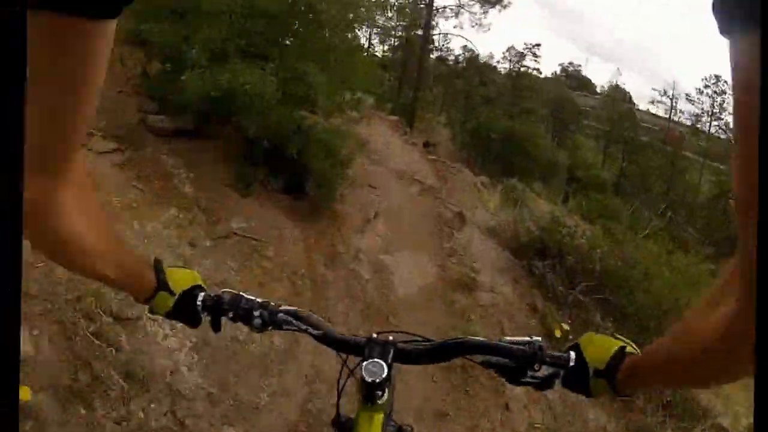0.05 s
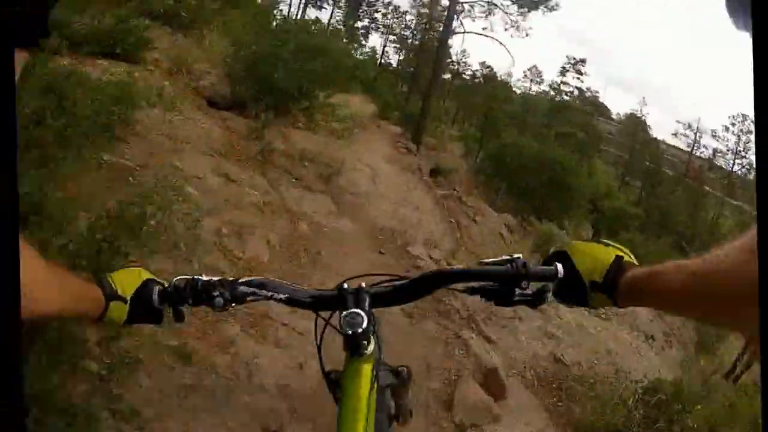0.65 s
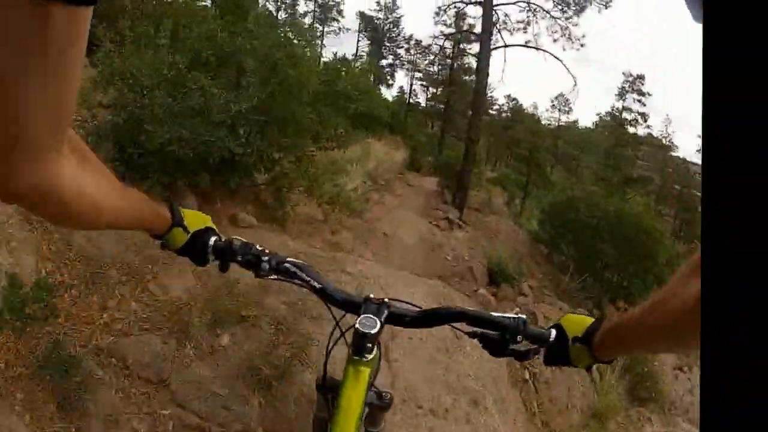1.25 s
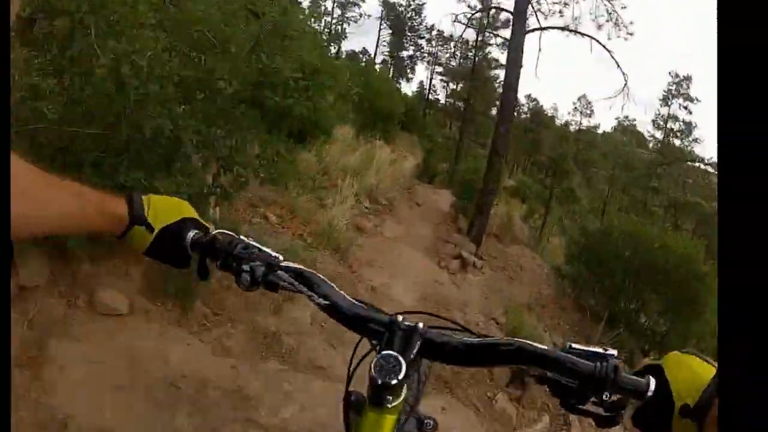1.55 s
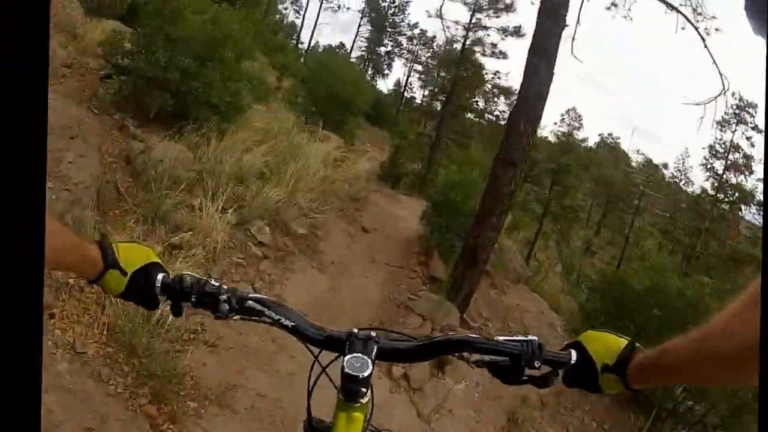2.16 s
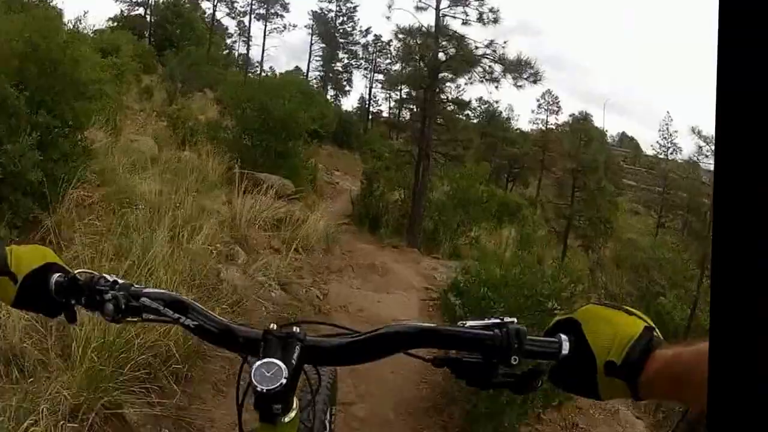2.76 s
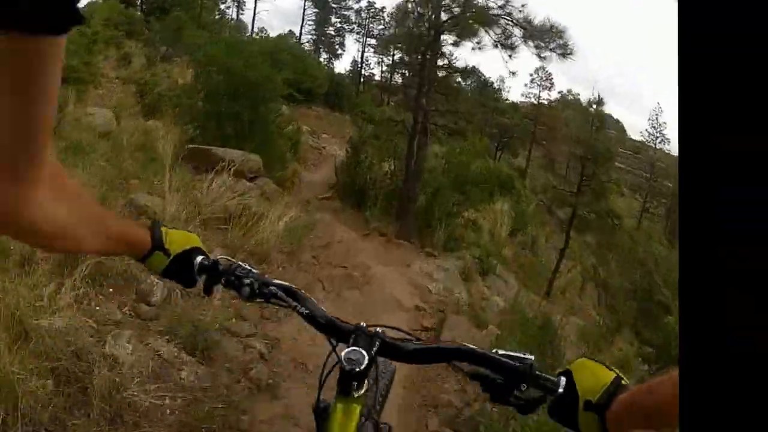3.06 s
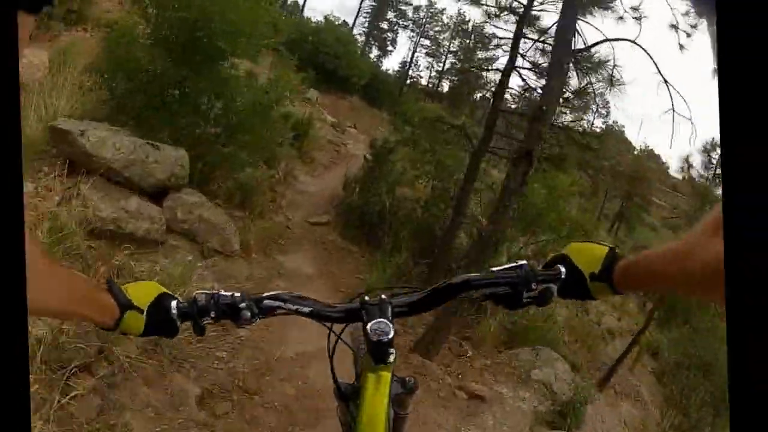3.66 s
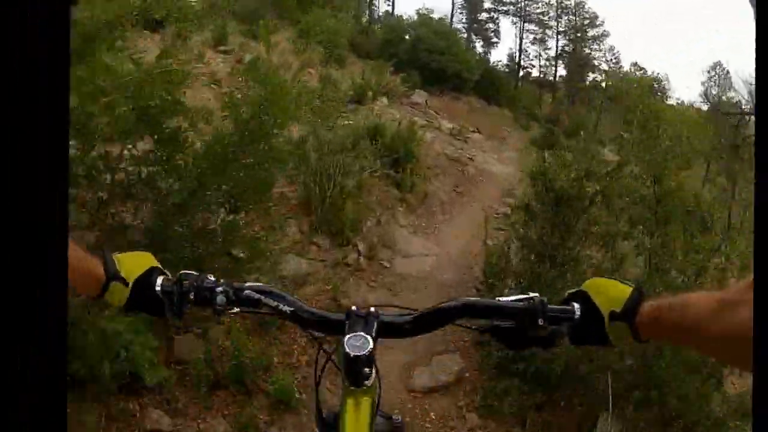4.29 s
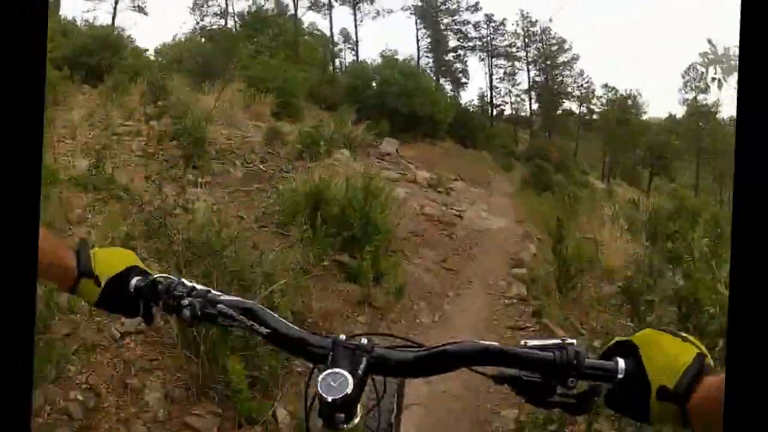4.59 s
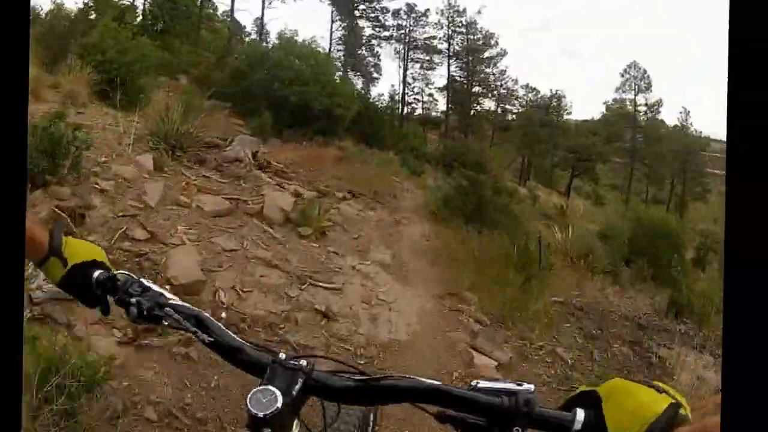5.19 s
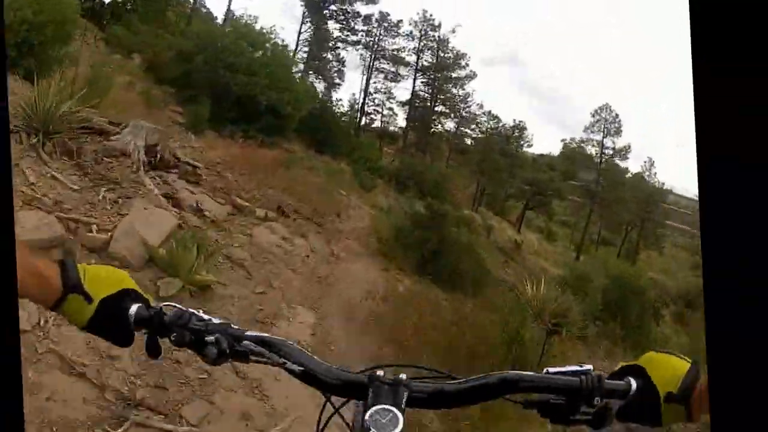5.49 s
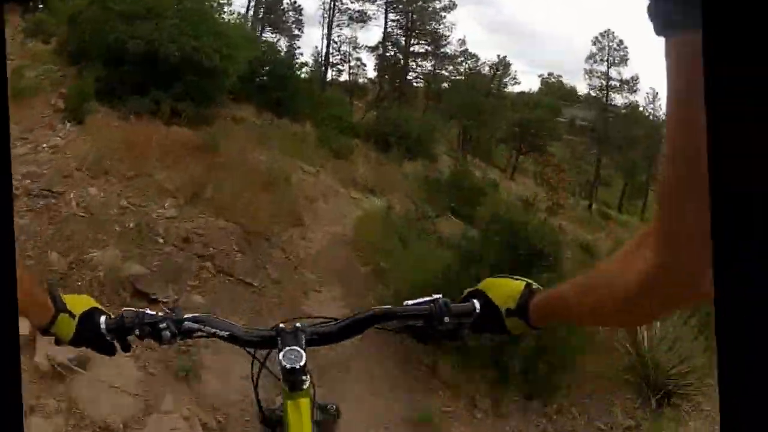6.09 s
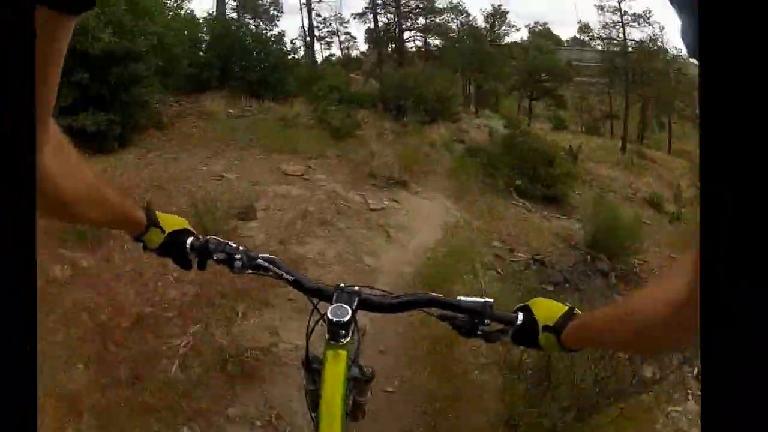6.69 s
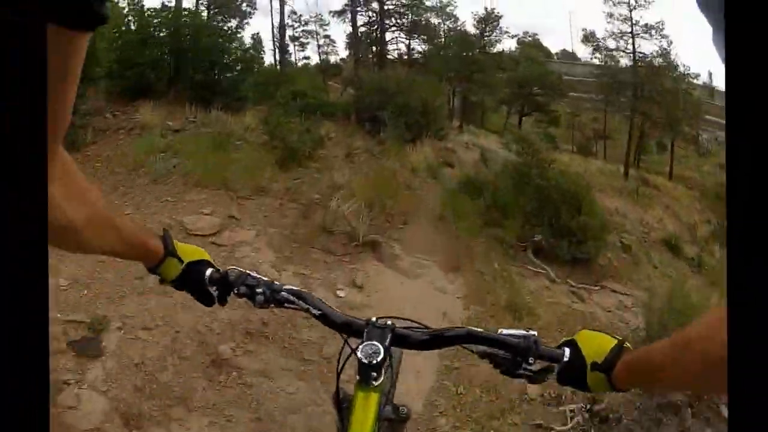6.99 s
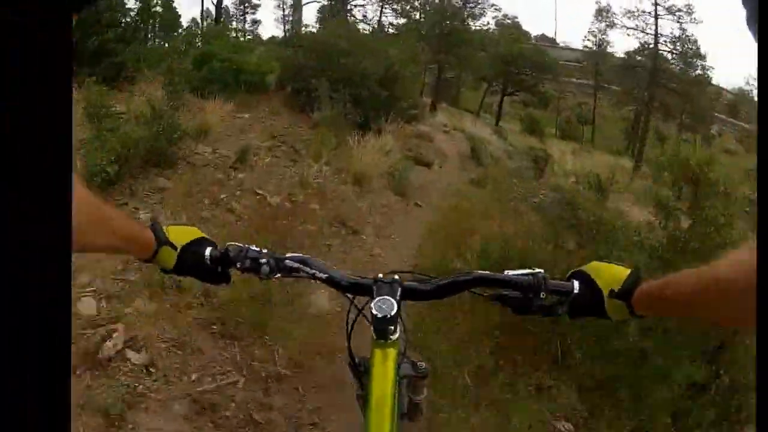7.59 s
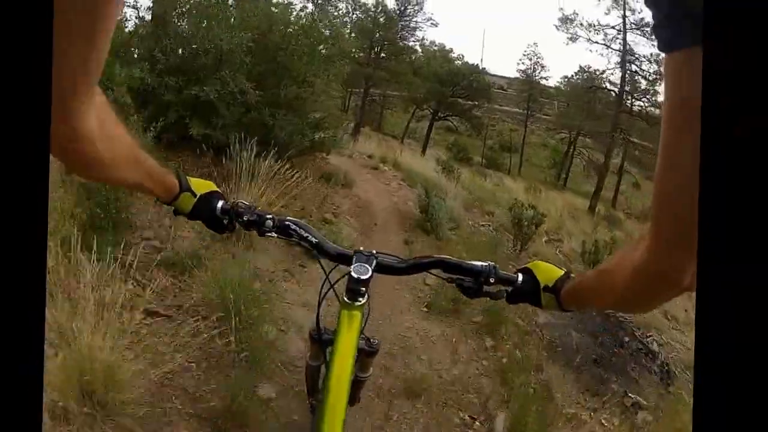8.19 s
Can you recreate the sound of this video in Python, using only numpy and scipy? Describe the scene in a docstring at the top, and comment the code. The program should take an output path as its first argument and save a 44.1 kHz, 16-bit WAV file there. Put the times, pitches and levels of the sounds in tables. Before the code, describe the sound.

A mountain bike rolls along a rocky dirt trail, heard from a camera on the rider's chest. Low wind buffets the microphone over rumbling, crunching tyres and a faint freewheel whirr. Early on, loose rock makes the plastic case knock and chatter. The wind dips briefly, then grows as the chain clinks and the bike speeds into its heaviest thuds near the end. A thin fizz runs throughout, with no echo.

```python
"""A mountain bike on an open dirt and rock trail, heard from a camera microphone on the rider's chest.
From the start air buffets the camera, tyres rumble and crunch below, and the freewheel whirrs.
At 0.5 s loose rock knocks the plastic case against its mount; a faint squeak follows at 1 s.
Bumps thud through bike and rider, and the wind drops over a crest near 3 s. From 4 s the chain clinks
and the bike gathers speed into the heaviest thuds, near 7.7 s. Coarse sampling adds a fizz throughout."""
import sys
import numpy as np
from scipy import signal
from scipy.fft import rfft, irfft, next_fast_len
from scipy.io import wavfile
from scipy.ndimage import uniform_filter1d, minimum_filter1d

SR = 44100
rng = np.random.default_rng(int(sys.argv[2]) if len(sys.argv) > 2 else 0)


def wav_out(sig):
    """Save sig, one row per channel (or a flat mono array), as 16-bit PCM at SR to the path in sys.argv[1]."""
    wavfile.write(sys.argv[1], SR, np.round(np.clip(np.atleast_2d(sig).T, -1, 1) * 32767).astype(np.int16))


N = 372642
TIME = np.arange(N) / SR

# air past the microphone, rising with speed and dropping over crests: (time [s], relative level [dB])
WIND = [(0, -21.5), (0.27, -27.5), (0.38, -23), (0.94, -24.5), (1.04, -27.5), (1.27, -28), (1.5, -23),
        (1.81, -27.5), (1.95, -23), (2.76, -23.5), (2.9, -33.5), (3.08, -31), (3.45, -22.5), (3.8, -23.5),
        (4.02, -30.5), (4.14, -25), (4.72, -20.5), (4.92, -16.0), (5.32, -21), (6.0, -13), (6.17, -16),
        (6.6, -13.0), (7.02, -15), (7.12, -19), (7.38, -20), (7.6, -11.5), (7.9, -11), (8.45, -16.5)]
# gusts on the case: (centre time [s], level above the wind [dB])
GUSTS = [(1.47, 1.5), (2.33, 4.5), (2.61, 7.5), (3.3, 5), (3.55, 6), (3.77, 1.5), (4.86, 4), (5.25, 5),
         (5.96, 4), (6.288, 7.5), (6.54, 5.5), (6.81, 3.5), (7.03, 7), (7.49, 8.5), (7.63, 2), (7.75, 5),
         (8.4, 5)]
# spectrum of wind on the microphone: (frequency [Hz], relative level [dB])
BUFFET_SPECTRUM = [(8.8, -36), (15, -14.5), (48, 1), (135, 1), (227, -3.5), (330, -10.5), (430, -31),
                   (730, -120)]
# wheels striking rock: (time [s], thud level [dB], pitch [Hz], tyre shudder level [dB])
THUDS = [(0.242, -19, 388, -30.5), (0.334, -16, 640, -22), (1.461, -10, 222, -46), (1.997, -4, 413, -23.5),
         (2.13, -13, 188, -28.5), (2.184, -14.5, 535, -24.5), (2.326, -13, 206, -31), (2.608, -8, 190, -42),
         (2.838, -15, 560, -27.5), (3.082, -21, 410, -35), (3.164, -19.5, 386, -43), (3.744, -11, 200, -45),
         (4.054, -14, 366, -27.5), (4.356, -11.5, 514, -26), (4.847, -9, 240, -28), (5.01, -10.5, 300, -25),
         (5.942, -13.5, 300, -14), (6.043, -7, 225, -17), (6.355, -12, 272, -24.5),
         (6.501, -6.5, 209, -17.5), (6.646, -9, 221, -16.5), (6.973, -7, 187, -29), (7.039, -6, 252, -19),
         (7.214, -4, 192, -22), (7.327, -12, 185, -19.5), (7.477, -2, 226, -30.5), (7.507, 1.5, 213, -20),
         (7.618, -7, 184, -23), (7.706, -2.5, 188, -34), (7.735, 2.5, 330, -35), (7.881, 1.5, 246, -16.5),
         (8.228, -4, 212, -17.5), (8.388, -7.5, 252, -20)]
# the case hitting its stop, in relative levels:
# (time [s], hollow ring [dB], sharp edge [dB], chatter [dB], chatter decay [s])
KNOCKS = [(0.0617, -26, -22.5, -29, 0.005), (0.361, -34, -26, -25, .008), (0.3974, -32, -25, -32, 0.0039),
          (0.4245, -14.5, -27, -18, 0.0086), (0.4964, -2.5, -5, -25, 0.011), (0.577, -18, -34, -18, 0.0084),
          (0.6479, -12.5, -11.5, -26.5, 0.015), (0.7248, -15, -33, -21, 0.008),
          (0.8607, -25, -24.5, -31, 0.0062), (0.9665, -20, -42, -23.5, 0.01),
          (1.037, -29.5, -29, -40, 0.0043), (1.17, -35, -48, -46, .004), (1.492, -34, -39, -31.5, 0.015),
          (1.5529, -17.5, -31, -24, 0.01), (1.6316, -36, -25, -28.5, 0.01), (1.727, -26, -27, -34.5, 0.015),
          (1.933, -38, -31, -27, 0.0036), (2.36, -3, -6.5, -24, 0.0073), (2.4525, -15, -20, -15, 0.0063),
          (2.486, -24.5, -23, -33, 0.0036), (2.694, -23.5, -23.5, -29.5, 0.0085),
          (2.9422, -28, -30, -31, 0.0092), (3.159, -27.5, -43, -34, 0.0062), (3.223, -32, -44, -35, 0.0045),
          (3.3644, -40, -25.5, -42, .005), (4.119, -41, -38, -31.5, 0.01), (4.17, -38, -23, -32, .004),
          (4.287, -27, -27, -33, .006), (4.328, -40, -42, -29.5, 0.025), (4.3958, -16, -25, -23, 0.0096),
          (4.9425, -31, -28, -44, .008), (5.126, -33, -38, -31.5, .008), (5.8092, -25, -42, -33.5, 0.01),
          (6.044, -25, -26, -38, .005), (6.7322, -17.5, -27, -28.5, 0.014),
          (6.744, -17, -22, -29.5, 0.0056), (7.572, -6.5, -3, -26, 0.005), (7.675, -23, -34, -26.5, 0.01),
          (7.9165, -18, -18, -32, .005)]
# resonances of the plastic case: (frequency [Hz], relative level [dB], time to fall 60 dB [s])
CASE_MODES = [(747, 7.5, 0.012), (1140, -2, 0.02), (1823, -10, 0.012), (2230, -8.5, 0.0079),
              (2767, -5.5, 0.014), (3150, -7.5, 0.0092), (3610, -12, 0.013), (4170, -3, 0.0028)]
# stretches of loose rock: (start [s], end [s], extra crunch [dB])
LOOSE_ROCK = [(0.33, 0.73, 12.5), (1.472, 1.81, 4.5), (2.218, 2.71, 9.5), (3.068, 3.424, 9.5),
              (4.228, 4.647, 7), (4.9, 5.15, 2), (5.72, 6.14, 3), (6.55, 6.773, 5), (7.46, 7.694, 10.5)]
# spectrum of tyres rolling on dirt: (frequency [Hz], relative level [dB])
RUMBLE_SPECTRUM = [(170, -15.5), (260, -3), (330, 2), (420, 0), (550, -3.5), (720, -7.5), (850, -19),
                   (960, -23.5), (1150, -28.5), (1350, -34), (2000, -48)]
# spectrum of grit under the tread: (frequency [Hz], relative level [dB])
CRUNCH_SPECTRUM = [(700, 7), (1150, -1), (1400, -6.5), (1800, -1), (2400, -3), (3500, -14.5), (4800, -8.5),
                   (5900, -14)]
# chain links slapping together: (time [s], relative level [dB], pitch [Hz])
CLINKS = [(4, -32, 2760), (4.9206, -30, 3220), (5.01, -30, 2870), (6.219, -29, 3010), (6.4088, -23, 2990),
          (6.5926, -21.5, 3320), (6.7565, -32, 2930), (7.1793, -28, 2800), (7.439, -26.5, 3260),
          (7.614, -23, 2920), (7.9169, -17, 1650), (7.9508, -29, 2900), (8.1754, -31, 2880),
          (8.2317, -27, 2770), (8.292, -18, 2670)]
# whirr of freewheel and chain along the trail: (time [s], base level [dB])
WHIRR_LEVEL = [(0, -41.5), (.3, -47), (.45, -49), (.75, -48.5), (1.4, -51.5), (1.85, -45.5), (2.15, -47),
               (2.85, -49.5), (3.6, -50.5), (4.7, -49), (4.9, -43), (5.8, -50), (6.6, -42.5), (7.0, -44),
               (7.35, -49), (7.6, -46.5), (8.15, -39.5), (8.45, -45)]
# spectrum of that whirr: (frequency [Hz], relative level [dB])
WHIRR_SPECTRUM = [(2300, -10.5), (2700, -4.5), (2980, -0.5), (3300, -7.5), (3900, -9.5), (4700, -16.5),
                  (5700, -26)]
# a faint falling squeak: (time [s], pitch [Hz], level [dB])
SQUEAK = [(1.012, 5100, -90), (1.021, 4950, -47), (1.034, 4300, -47), (1.050, 3800, -44),
          (1.062, 3500, -90)]


def wind(flow, jolts, bounce, level_db=-21.0, lump_db=2.5, surge_db=2.0, deep_hz=60):
    """Right at the microphone, eddies break on the case in lumps."""
    air = coloured(rng.standard_normal(N), BUFFET_SPECTRUM) * from_db(lump_db * jolts)
    # faster air makes smaller eddies, so the deepest part grows less than the rest
    deep = signal.sosfiltfilt(signal.butter(2, deep_hz, fs=SR, output="sos"), air)
    air = air - deep + deep * from_db(-0.5 * flow)
    return from_db(level_db + flow + surge_db * bounce) * evened(air, size=2200)


def thuds(rise_cycles=1.17):
    """A tyre meets a rock: a soft blow comes up through bike and rider and dies in a few cycles."""
    out = np.zeros(N)
    for s, db, hz, _ in THUDS:
        start = round(s * SR)
        cycles = TIME[:min(N - start, SR // 10)] * hz
        age = cycles / rise_cycles
        envelope = from_db(db) * age * np.exp((1 - age ** 2) / 2)
        out[start:start + len(cycles)] += envelope * np.sin(2 * np.pi * cycles)
    return out


def case_knocks(ring_db=10.5, edge_db=10.0, crack_db=-7.5, crack_s=0.00096, detune=0.023):
    """The case around the microphone hits its stop: the edge cracks and the shell rings briefly."""
    out, t = np.zeros(N), TIME[:SR // 20]
    hz, mode_db, t60 = np.transpose(CASE_MODES)[:, :, None]
    low = hz < 1400  # these modes start in phase, as one hollow note
    attack = 1 - np.exp(-(t / np.where(low, .002, .0013)) ** 2)
    crack_band = signal.butter(2, [2300, 5600], "band", fs=SR, output="sos")
    hardest = max(edge for _, _, edge, _, _ in KNOCKS)
    for s, hollow, edge, _, _ in KNOCKS:
        # the ring shifts with the contact point
        pitch, strength, phase = rng.normal(0, 1, (3, len(hz), 1))
        waves = np.sin(2 * np.pi * (hz * (1 + detune * pitch) * t + phase * ~low))
        struck_db = np.where(low, hollow + ring_db, edge + edge_db) + mode_db + strength
        shell = (from_db(struck_db - 60 * t / t60) * waves * attack).sum(0)
        crack = rms_one(signal.sosfilt(crack_band, rng.standard_normal(len(t))))
        crack *= t / crack_s * np.exp(1 - t / crack_s)
        crack *= from_db(edge + crack_db + 0.083 * (edge - hardest))  # light touches hardly crack
        start = round(s * SR)
        out[start:start + len(t)] += shell + crack
    return out


def mount_chatter(rock, lag_s=0.0037, scrape_db=-13.5, shakes_per_s=11, shake_db=-43, shake_s=0.0091):
    """At each knock, and as the mount shakes, rapid small contacts ring the case at the microphone."""
    contacts = grains(1000, spread_db=1.0)
    modes = sum(from_db(db) * ring(contacts, hz, t60) for hz, db, t60 in CASE_MODES)
    bass_cut = signal.butter(2, 480, "high", fs=SR, output="sos")  # a small shell radiates no bass
    shell = rms_one(signal.sosfilt(bass_cut, modes))
    scrape = coloured(contacts, [(900, 10), (1900, 12), (3500, -6), (5800, -34.0)])
    bursts = [(s + lag_s, db, decay_s) for s, _, _, db, decay_s in KNOCKS]
    shake_times = np.cumsum(rng.uniform(.5, 1.5, size=200)) / shakes_per_s
    for s, scatter_db in zip(shake_times, rng.normal(0, 2.5, len(shake_times))):
        if s < TIME[-1]:  # the mount shakes all the way down, harder on loose rock
            bursts.append((s, shake_db + 0.97 * rock[int(s * SR)] + scatter_db, shake_s))
    return swells(bursts, rise_share=0.77) * evened(shell + from_db(scrape_db) * scrape, size=330)


def tyre_rumble(flow, rock, jolts, bounce, level_db=-31, judder_db=1.5, lag_s=0.0044, decay_s=0.017):
    """Below the rider, knobbly tyres judder over the ground and shudder after each thud."""
    ground = coloured(rng.standard_normal(N), RUMBLE_SPECTRUM)
    ground *= from_db(judder_db * (0.92 * jolts + 1.16 * drift(31)))
    rolling = from_db(level_db + 0.91 * flow + 0.12 * rock + 2.5 * bounce)
    shudder = swells([(s + lag_s, db, decay_s) for s, _, _, db in THUDS], rise_share=0.39)
    return np.hypot(rolling, shudder) * evened(ground, size=1500)


def tyre_crunch(flow, rock, level_db=-49.5, stones_per_s=1100, clump_db=5.5):
    """Down on the trail, stones grind in clumps over a hiss of dust, more as the tread bites harder."""
    bite_db = 0.39 * flow + rock
    stones = rms_one(grains(stones_per_s * from_db(.5 * bite_db), spread_db=1.5))
    dust = 0.72 * rng.standard_normal(N)
    crunch = coloured(stones + dust, CRUNCH_SPECTRUM) * from_db(clump_db * drift(41))
    return from_db(level_db + bite_db) * evened(crunch, size=3000)


def chain_clinks(level_db=-2.0, t60=0.031, partials_db=-6.5, attack_s=0.00054):
    """By the rider's feet, links slap together: a short ring with unrelated partials around it."""
    out, t = np.zeros(N), TIME[:SR // 10]
    for (s, db, hz), chance in zip(CLINKS, rng.random((len(CLINKS), 5))):
        partials = np.sin(2 * np.pi * np.outer(hz * (.8 + .8 * chance), t)).sum(0)
        tone = np.sin(2 * np.pi * hz * t) + from_db(partials_db) * partials
        envelope = from_db(db + level_db - 60 * t / t60) * (1 - np.exp(-t / attack_s))
        start = round(s * SR)
        out[start:start + len(t)] += envelope * tone
    return out


def drivetrain(flow, sway_db=3.0, ping_db=-3.5, ping_t60=0.057, flutter_db=1.0):
    """Behind the rider, freewheel and chain run in a metallic whirr, with pings from single links."""
    level_db, = in_time(WHIRR_LEVEL)
    ticks = coloured(grains(1800, spread_db=2.0), WHIRR_SPECTRUM) * from_db(sway_db * drift(25))
    links = sum(ring(grains(18, spread_db=2.5), hz, ping_t60) for hz in np.geomspace(2650, 4800, 9))
    pings = from_db(ping_db) * coloured(links, WHIRR_SPECTRUM)
    gain = from_db(level_db + .15 * flow + flutter_db * drift(15))  # dips as the bike goes light
    return gain * evened(ticks + pings, size=2500)


def squeak():
    """One thin whistle slides down, faint under the wind."""
    hz, db = in_time(SQUEAK)
    sounding = (TIME > SQUEAK[0][0]) & (TIME < SQUEAK[-1][0])
    return from_db(db) * np.sin(2 * np.pi * np.cumsum(hz) / SR) * sounding


def airflow(mean_db=-21.5, gust_s=.03):
    """Wind and gusts at the rider's chest, in dB above the mean wind."""
    wind_db, = in_time(WIND)
    return wind_db - mean_db + sum(db * np.exp(-((TIME - s) / gust_s) ** 2) for s, db in GUSTS)


def rockiness(edge_s=0.021):
    """Extra crunch in dB as the wheels roll on and off loose rock."""
    return sum(db * (np.tanh((TIME - start) / edge_s) - np.tanh((TIME - end) / edge_s)) / 2
               for start, end, db in LOOSE_ROCK)


def from_db(db):
    """Decibels to gain."""
    return 10 ** (np.asarray(db) / 20)


def rms_one(x):
    """Scale to rms 1."""
    return x / np.sqrt(np.mean(x ** 2) + 1e-20)


def in_time(rows):
    """Each column of a curve at every sample."""
    s, *columns = np.transpose(rows)
    return [np.interp(TIME, s, c) for c in columns]


def coloured(x, spectrum):
    """Shape x by a spectrum that falls 20 dB an octave past its ends; rms 1."""
    hz, db = np.transpose(spectrum)
    size = next_fast_len(N, real=True)
    octave, points = np.log2(np.fft.rfftfreq(size, 1 / SR) + 1), np.log2(hz)
    outside = np.abs(octave - np.clip(octave, points[0], points[-1]))
    gain = from_db(np.interp(octave, points, db) - 20 * outside)
    return rms_one(irfft(rfft(x, size) * gain, size)[:N])


def drift(rate_hz):
    """Smooth random wander, mostly slower than rate_hz; rms 1."""
    r = np.exp(-2 * np.pi * rate_hz / SR)
    return rms_one(signal.lfilter([1], [1, -2 * r, r * r], rng.standard_normal(N + SR))[SR:])


def evened(x, size):
    """Hold the level at 1 over spans of size samples; faster lumps stay."""
    return x / np.sqrt(uniform_filter1d(uniform_filter1d(x ** 2, size), size) + 1e-12)


def grains(per_s, spread_db):
    """Random clicks: many small, a few large."""
    sizes, sign = rng.exponential(1, N), np.sign(rng.random(N) - .5)
    born = rng.random(N) < per_s / SR
    return born * sign * from_db(spread_db * np.minimum(sizes, 4))


def ring(clicks, hz, t60):
    """Each click starts a sine that falls 60 dB in t60 seconds."""
    r, w = from_db(-60 / (t60 * SR)), 2 * np.pi * hz / SR
    return signal.lfilter([0, np.sin(w)], [1, -2 * r * np.cos(w), r * r], clicks + 1e-18)


def swells(rows, rise_share):
    """Gain from (time [s], level [dB], decay [s]) swells, each rising in a share of its decay time."""
    power = np.zeros(N)
    for s, db, decay_s in rows:
        near = slice(max(round(s * SR) - SR // 10, 0), round(s * SR) + SR // 5)
        t = (TIME[near] - s) / decay_s
        power[near] += (2 * from_db(db) * np.exp(-np.logaddexp(-t / rise_share, t))) ** 2
    return np.sqrt(power)


def limiter(x, ceiling_db=0.5, release_db_per_s=97.0):
    """Peaks over the ceiling push the gain down, and it creeps back."""
    over = np.maximum(20 * np.log10(np.abs(x) + 1e-9) - ceiling_db, 0)
    held = np.maximum.accumulate(over + release_db_per_s * TIME) - release_db_per_s * TIME
    return x * from_db(uniform_filter1d(minimum_filter1d(-held, size=41), size=41))


def scene():
    """One microphone inside the case, all sources within a bike's length; the hillside gives no echo."""
    flow, rock = airflow(), rockiness()
    jolts, bounce = drift(29.4), drift(6.1)  # wind and tyres swell together
    air = wind(flow, jolts, bounce)
    rolling = tyre_rumble(flow, rock, jolts, bounce) + tyre_crunch(flow, rock) + drivetrain(flow)
    impacts = thuds() + case_knocks() + mount_chatter(rock) + chain_clinks()
    return (air + rolling + impacts + squeak())[None]


def record(dry, hold_hz=12000, soften_hz=5850, cutoff_hz=15500):
    """The camera limits, then holds each slow sample: the steps mirror sound into the treble as fizz."""
    limited = np.clip(limiter(dry[0]), -.97, .97)
    slow = signal.resample_poly(limited, hold_hz, SR)
    slow = signal.lfilter(*signal.butter(1, soften_hz, fs=hold_hz), slow)
    steps = signal.resample_poly(np.repeat(slow, 4), SR, 4 * hold_hz)[:N]
    return signal.sosfilt(signal.ellip(12, .1, 100, cutoff_hz, fs=SR, output="sos"), steps)[None]


dry = scene()
out = record(dry)
wav_out(out)
```